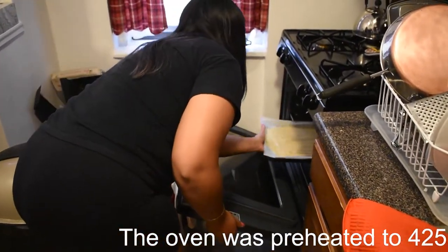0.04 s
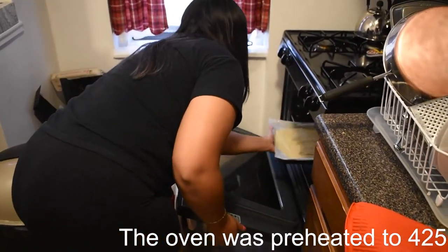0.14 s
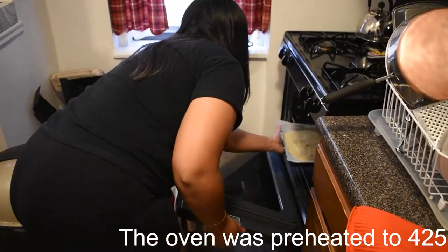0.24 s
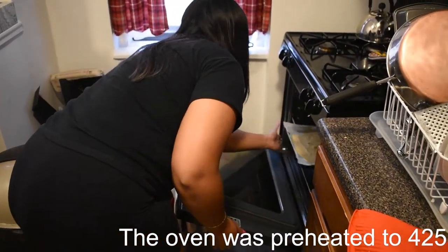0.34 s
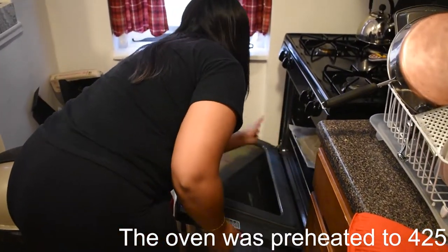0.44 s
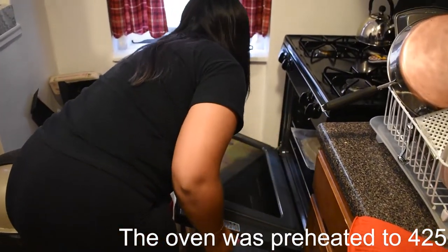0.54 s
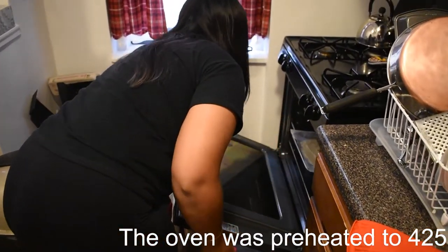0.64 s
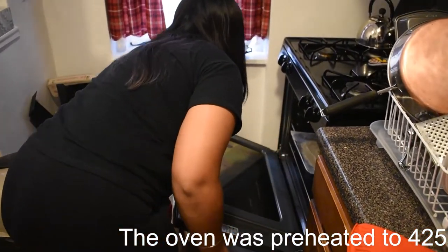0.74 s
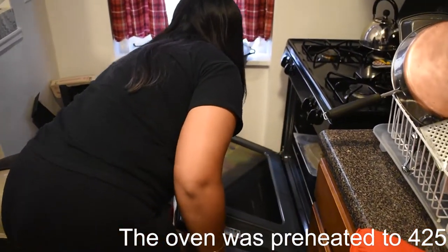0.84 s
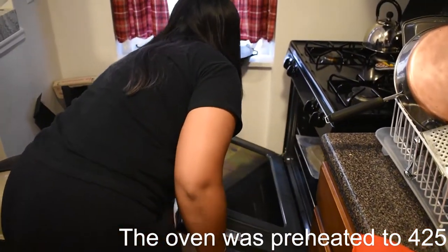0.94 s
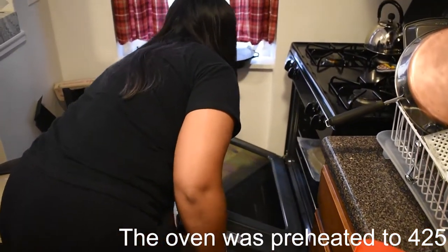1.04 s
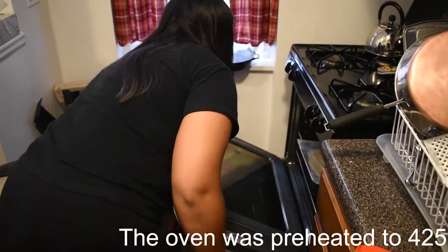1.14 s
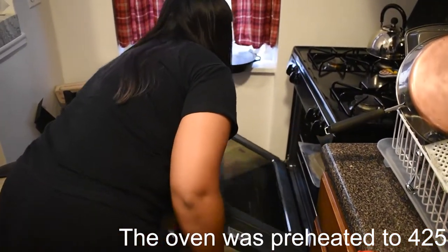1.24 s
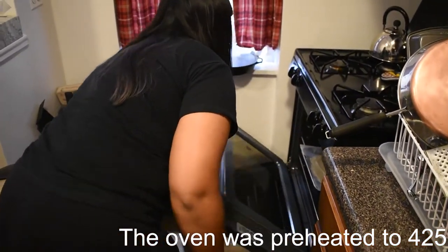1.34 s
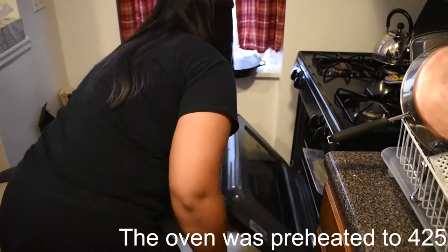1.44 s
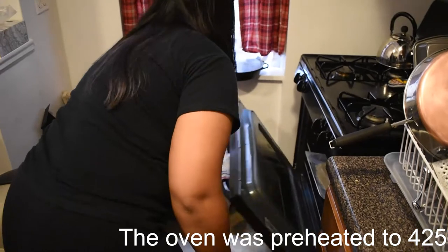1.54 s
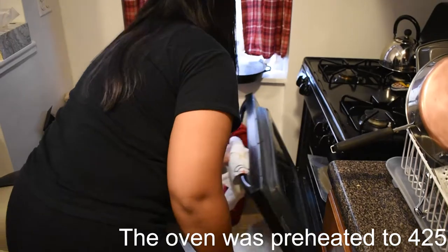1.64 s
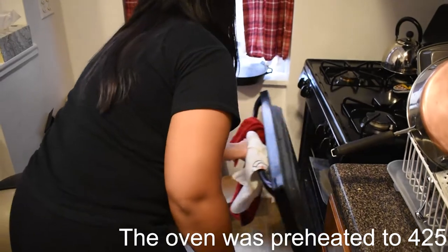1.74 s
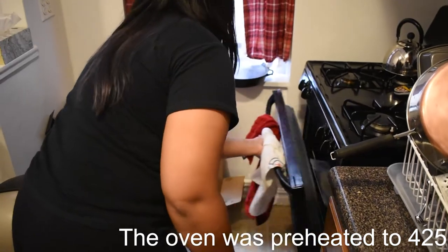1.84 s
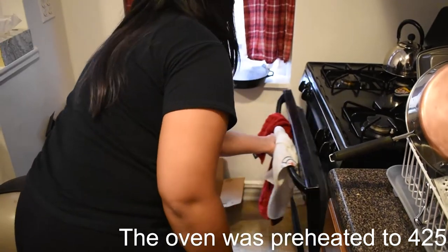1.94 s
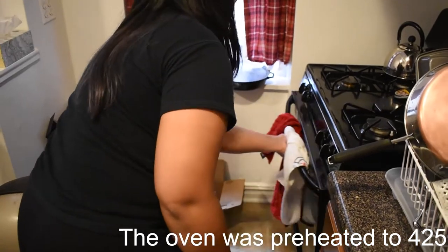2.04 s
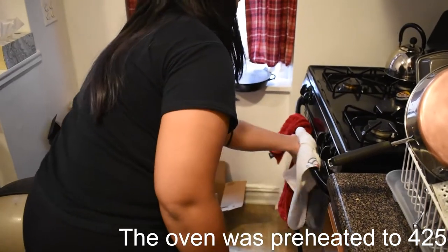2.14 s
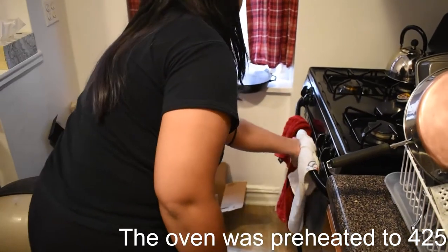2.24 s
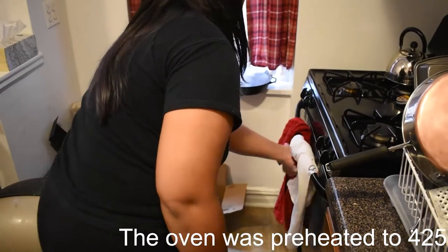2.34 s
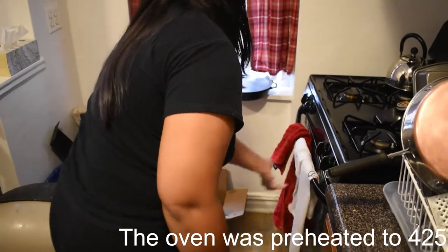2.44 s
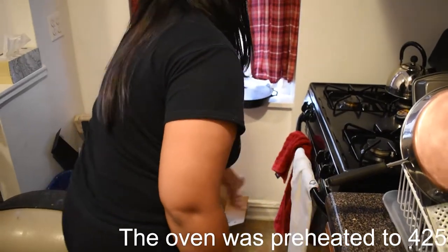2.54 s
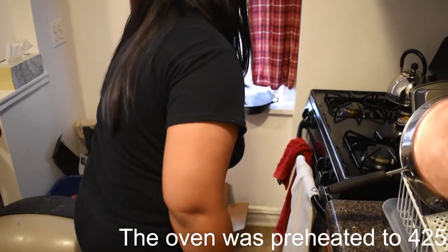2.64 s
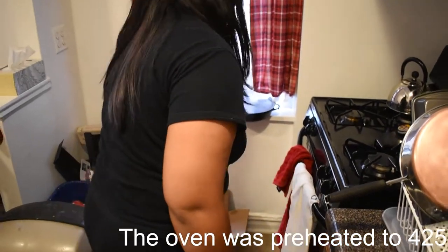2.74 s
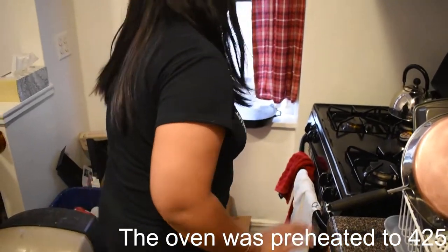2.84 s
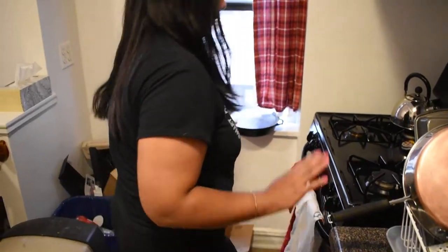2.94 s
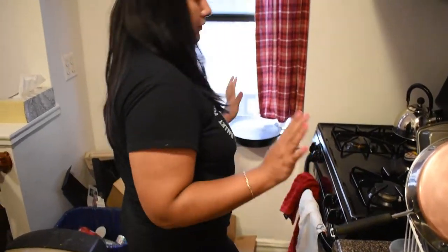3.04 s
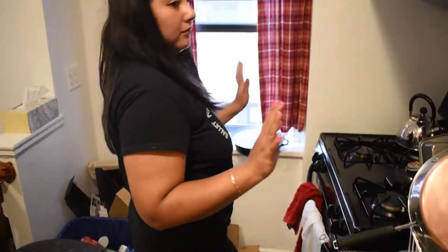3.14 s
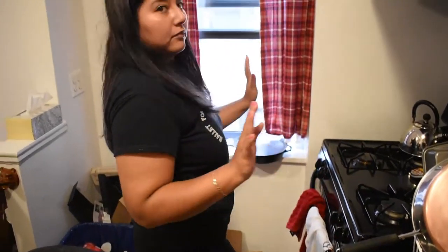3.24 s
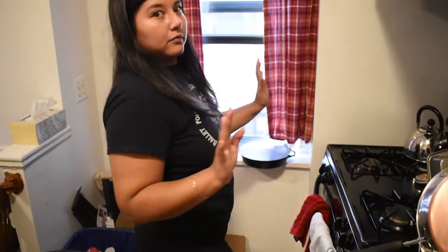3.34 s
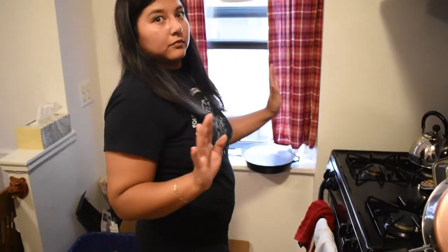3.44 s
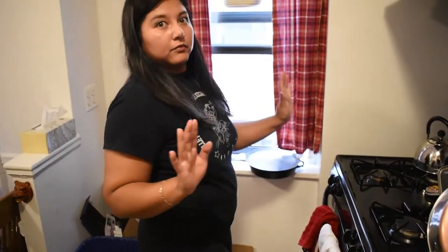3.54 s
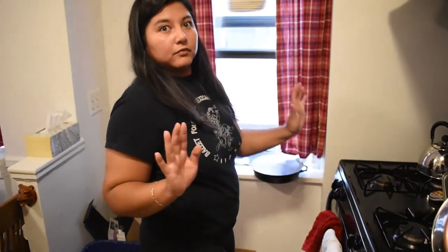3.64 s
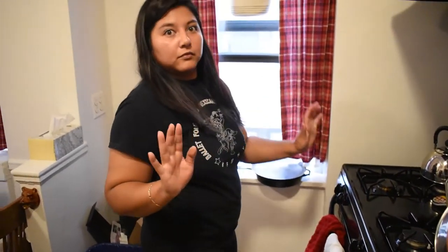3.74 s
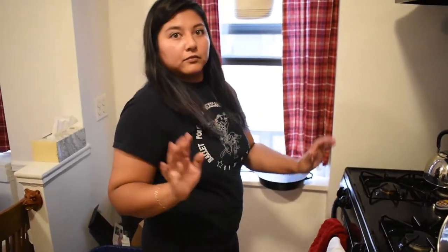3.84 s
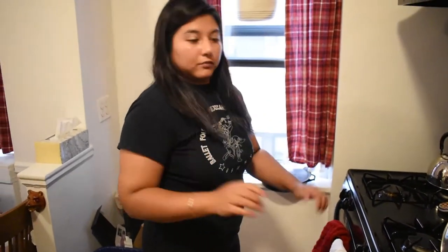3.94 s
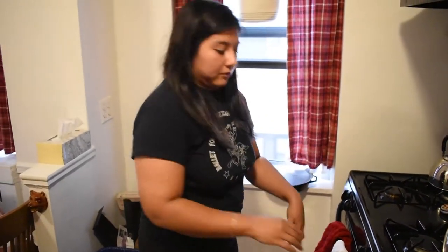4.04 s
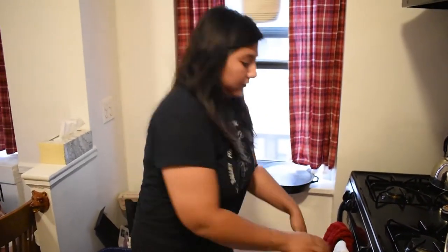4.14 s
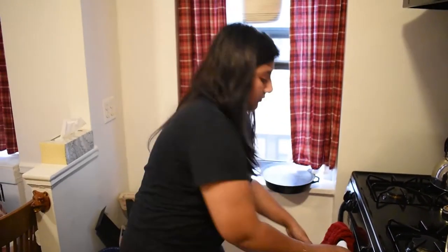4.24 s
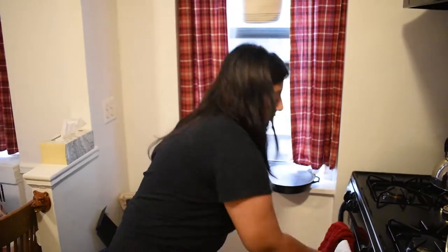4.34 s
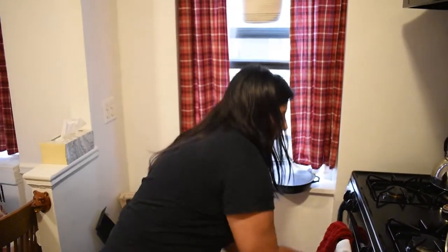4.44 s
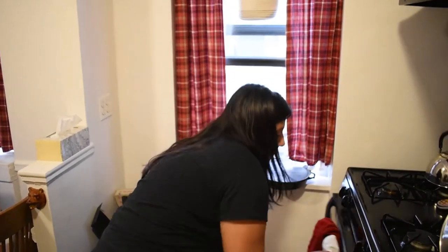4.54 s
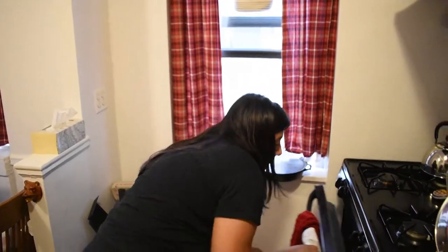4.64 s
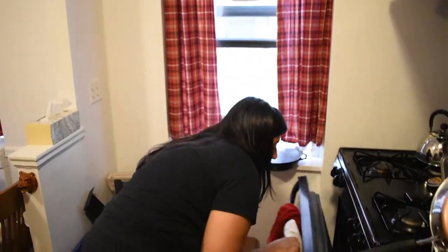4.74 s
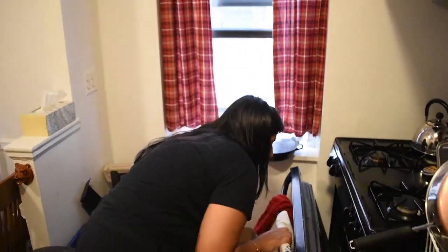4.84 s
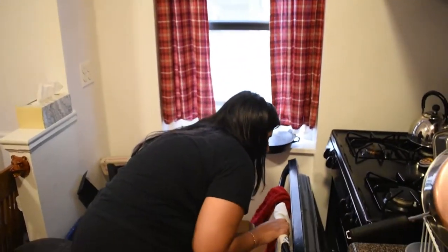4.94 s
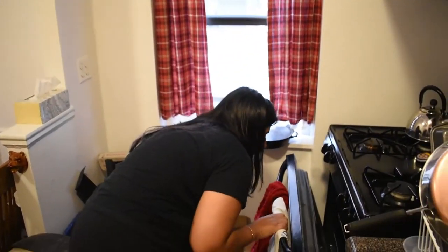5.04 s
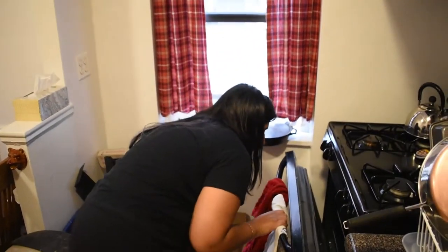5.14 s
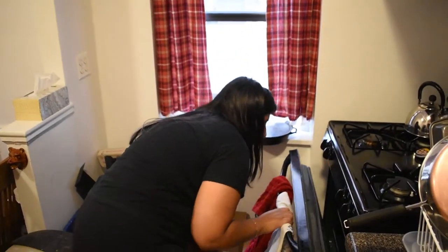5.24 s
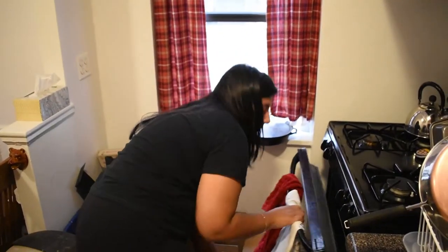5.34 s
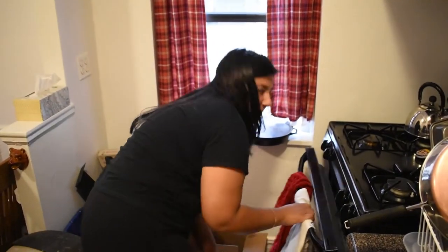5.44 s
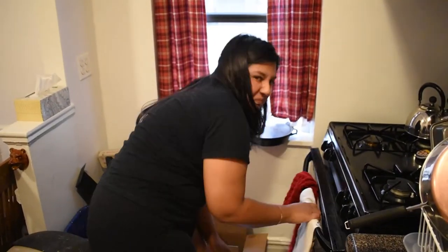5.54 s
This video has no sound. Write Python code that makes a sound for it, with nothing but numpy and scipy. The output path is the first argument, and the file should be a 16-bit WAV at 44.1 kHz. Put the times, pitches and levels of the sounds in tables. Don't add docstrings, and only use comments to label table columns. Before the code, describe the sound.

A close microphone in a small, reflective kitchen picks up soft hiss, low rumble, a very faint high appliance whine and slow, deep air buffeting. At 0 s a metal baking pan touches an oven rack with several quick clacks, then slides in with a grainy scrape that fades by 0.4 s. At about 0.52 s it knocks home in a loud, bright double clang; rim and rack wires ring on with a wavering beat. Small metallic taps come around 1.7 to 1.9 s. From 2.1 to 2.4 s the oven door slams in a dense run of steel bangs, rattles and bassy judders, strongest near 2.3 s, with wires ringing after. A slight settling knock follows at 2.7 s. Faint bright ticks dot 3 to 4.4 s. At 4.5 s the seal releases with a soft hollow knock; from 4.7 to 5.1 s the door eases open with light hinge rubbing and padded thumps, then quiet.

```python
import sys
import numpy as np
from scipy import signal
from scipy.io import wavfile

SR = 44100
rng = np.random.default_rng(int(sys.argv[2]) if len(sys.argv) > 2 else 0)


def volts_from_db(level):
    exponent = np.asarray(level, float) / 20
    return 10 ** exponent


def wav_out(sig):
    wavfile.write(sys.argv[1], SR, np.round(np.clip(np.atleast_2d(sig).T, -1, 1) * 32767).astype(np.int16))


N = 246553


def rms_one(x):
    return x / np.sqrt(np.mean(x ** 2) + 1e-20)


def at_hz(points, hz):
    table_hz, values = np.transpose(points)
    return np.interp(np.log(hz), np.log(table_hz), values)


def passed(x, hz, kind, order=2):
    return signal.sosfilt(signal.butter(order, hz, kind, fs=SR, output="sos"), x)


def drift(rate):
    hold = 40
    r = np.exp(-2 * np.pi * rate * hold / SR)
    white = rng.standard_normal(N // hold + 2002)
    slow = rms_one(signal.lfilter([1], [1, -2 * r, r * r], white)[2000:])
    return np.interp(np.arange(N) / hold, np.arange(len(slow)), slow)


def ring(clicks, hz, t60):
    r, w = volts_from_db(-60 / (t60 * SR)), 2 * np.pi * hz / SR
    return signal.lfilter([0, np.sin(w)], [1, -2 * r * np.cos(w), r * r], clicks + 1e-18)


def clicks_at(events):
    clicks = np.zeros(N)
    for s, level_db in events:
        clicks[round(s * SR)] = volts_from_db(level_db)
    return clicks


def banded(size, spectrum, shape):
    edges = 40 * 2 ** (np.arange(27) / 3)
    white = rng.standard_normal((2, *size))
    out = np.zeros(size)
    for k, (low, high) in enumerate(zip(edges, edges[1:])):
        hz = np.sqrt(low * high)
        if spectrum[0][0] < high and low < spectrum[-1][0]:
            band = passed(white[k % 2], [low, high], "band")
            out += volts_from_db(at_hz(spectrum, hz)) * shape(hz) * band
    return out


def room_hiss():
    # frequency in Hz, density in dB per Hz.
    hiss_spectrum = [(150, -32), (250, 1.5), (400, -3), (640, -5), (890, -11.5), (1330, -10.5),
                     (1800, -18.5), (2900, -22), (3600, -20.5), (5500, -25.5), (8000, -30.5),
                     (13400, -35.5), (16000, -41)]
    return volts_from_db(-48) * rms_one(banded((N,), hiss_spectrum, lambda hz: volts_from_db(1.5 * drift(4.9))))


def floor_shake():
    # time of the peak in seconds, level in dB.
    shakes = [
        (0.0, -38),
        (.81, -52),
        (1.7, -53),
        (2.32, -22),
        (4.95, -41),
    ]
    swell_db_per_s, settle_db_per_s, steady_db = 140, 75, -54
    t = np.arange(N) / SR
    gain = volts_from_db(steady_db)
    for s, db in shakes:
        fall_db = np.maximum(swell_db_per_s * (s - t), settle_db_per_s * (t - s))
        gain = gain + volts_from_db(db - fall_db)
    return gain


def house_rumble():
    # frequency in Hz, density in dB per Hz.
    hum_spectrum = [(40, -2), (55, 0), (80, -16), (100, -17), (120, 3), (160, -3), (220, -5.5), (300, -12),
                    (500, -30)]
    return floor_shake() * rms_one(banded((N,), hum_spectrum, lambda hz: volts_from_db(1.161 * drift(2.6))))


def appliance_whine():
    hz = 3510 + 9.0 * drift(28)
    return volts_from_db(-63.5 + 1.6 * drift(4)) * np.sin(2 * np.pi * np.cumsum(hz) / SR)


def air_pressure():
    # time in seconds, level in dB.
    air_curve = [(0.0, -28), (0.26, -19), (0.53, -32), (0.9, -28), (0.93, -39), (1.29, -22), (1.35, -32),
                 (1.71, -19), (2.52, -37), (2.58, -20), (2.75, -29), (4.73, -32), (4.9, -24), (5.09, -35),
                 (5.51, -30), (5.59, -42)]
    swing_hz = 12.0 + 2.2 * drift(2.956)
    swings = np.sin(2 * np.pi * np.cumsum(swing_hz) / SR) * volts_from_db(2.2 * drift(5))
    flutter = passed(rng.standard_normal(N + SR), [18.0, 45.0], "band")[SR:]
    swing_db = np.interp(np.arange(N) / SR, *np.transpose(air_curve))
    return volts_from_db(swing_db) * rms_one(swings) + volts_from_db(-47.0) * rms_one(flutter)


def grains(per_s, spread_db):
    size_db = spread_db * np.minimum(rng.exponential(1, N), 5)
    sizes = volts_from_db(size_db) * rng.choice([-1, 1], N)
    return rms_one(sizes * (rng.random(N) < per_s / SR))


def sliding(strokes):
    edge_s = .045
    t = np.arange(N) / SR
    pressure = np.zeros(N)
    for s, length, start_db, end_db in strokes:
        fade = np.clip(np.minimum(t - s, s + length - t) / edge_s, 0, 1)
        pressure += fade * volts_from_db(np.interp(t, [s, s + length], [start_db, end_db]))
    return grains(per_s=3000, spread_db=4.0) * pressure * volts_from_db(-17.5 + 2.0 * drift(21))


def contacts(blows, strokes, law):
    rattle_s, rattle_s_per_db, lows_db, lows_per_level, lows_per_hardness, padded_top_hz = law
    low_edge_hz, high_edge_hz = 700, 3500
    rattle = grains(per_s=2500, spread_db=1.5)
    low, mid, high, padded = np.zeros((4, N))
    for s, level_db, high_db in blows:
        start = round(s * SR)
        since = np.arange(start, start + SR // 3) / SR - s
        length = rattle_s + rattle_s_per_db * (level_db + 20)
        low_db = lows_db + lows_per_level * (level_db + 20) + lows_per_hardness * high_db
        burst = rattle[start:][:len(since)] * np.exp(-since / length) * volts_from_db(level_db - 22.0)
        burst *= 1 - np.exp(-since / 0.0017)
        burst[:4] += volts_from_db(level_db - 10.0) * np.array([1, -1, -1, 1])
        if high_db > -25:
            parts = (low, low_db + 7.5), (mid, 0), (high, high_db + 9.0)
        else:
            parts = ((padded, -3.0),)
        for part, db in parts:
            part[start:][:len(since)] += burst * volts_from_db(db)
    rub = sliding(strokes)
    low, mid, high = low + rub * volts_from_db(1.5), mid + rub, high + rub * volts_from_db(-1.5)
    low = passed(low, 2 * low_edge_hz, "low")
    upper = high + passed(mid - high, high_edge_hz, "low")
    bare = low + passed(upper - low, low_edge_hz, "high")
    return bare, passed(padded, [330, padded_top_hz], "band")


def shell(forces, colour, count=5):
    # frequency in Hz, t60 in seconds.
    ring_out = [(150, 0.55), (500, 0.54), (1500, .55), (4000, 0.44), (8000, 0.39), (16000, 0.11)]
    t = np.arange(SR * 3 // 4) / SR
    early = 1 + 2.47 * np.exp(-t / 0.0054)
    answers = banded((count, len(t)), colour, lambda hz: volts_from_db(-60 * t / at_hz(ring_out, hz)) * early)
    answers /= np.max(np.abs(answers))
    bare, padded = forces
    spot = rng.integers(0, count, N)
    touched = bare * (spot == np.arange(count)[:, None])
    touched[0] += padded
    return signal.oaconvolve(touched, answers, axes=1).sum(axis=0)[:N]


def rack(modes, strikes):
    clicks = clicks_at(strikes)
    return sum(volts_from_db(mode_db + 5.2 * drift(7.9)) * ring(clicks, hz, t60) for hz, mode_db, t60 in modes)


def pan():
    # start in seconds, peak in dB, hardness as highs in relative dB.
    blows = [(0.003, -15, -14), (0.02, -15, -16), (0.042, -18, -14), (0.074, -19.5, -14),
             (0.099, -24.5, -12), (0.163, -31.5, -19), (0.257, -35, -8), (0.419, -32.5, -2),
             (0.46, -29, -22), (0.521, -9, -2.5), (0.534, -10.5, -7.5), (0.545, -4, -14.5),
             (0.576, -12, -13), (1.662, -29, -10), (1.718, -38, -8), (1.883, -27, -38)]
    # start in seconds, length in seconds, start level in dB, end level in dB.
    strokes = [
        (-.05, .27, -19, -42),
        (.18, .25, -39, -45),
        (.39, .12, -43, -41),
    ]
    # frequency in Hz, density in dB per Hz.
    steel = [(100, -6.5), (200, 2), (400, -2), (800, 2), (1300, 4), (2000, -2), (3600, -4.5), (5500, -8.5),
             (8000, -19.5), (11000, -19.5), (15500, -23.5), (17000, -50)]
    # frequency in Hz, level in dB, t60 in seconds.
    modes = [(307, -40.5, 2.6), (318, -47, 2.5), (334, -36, 2.44), (881, -35, 1.9), (897, -34, 1.8),
             (1263, -27, 0.39), (1740, -43, 1.6), (1780, -43, 1.4), (1970, -32.5, .4), (2864, -51.5, 1.57),
             (2912, -48, 1.15), (3770, -43, .45), (4170, -42, 0.55)]
    # start in seconds, level in dB.
    strikes = [
        (0.004, -18),
        (0.525, -1.5),
        (0.548, -9),
    ]
    law = (.017, .0003, -11.0, -.7, -.15, 4000.0)
    return shell(contacts(blows, strokes, law), steel) + rack(modes, strikes)


def grate():
    # frequency in Hz, level in dB, t60 in seconds.
    modes = [(324.37, -34, 3.9), (331, -39.5, 3.4), (342, -36.5, 2.9), (418, -31.5, 1.08), (880, -44, 2.5),
             (910, -47, 2.1), (1440, -41, .6), (1766, -42.5, 2.56), (1770, -52, 2.3), (2086.4, -44, 1.5),
             (2290.3, -42, .7)]
    # start in seconds, level in dB.
    strikes = [
        (0.004, -16),
        (0.164, -13),
        (2.117, -4),
        (2.286, -8),
        (2.31, -5.5),
        (4.54, -20),
    ]
    return rack(modes, strikes)


def door_shell():
    # start in seconds, peak in dB, hardness as highs in relative dB.
    blows = [(2.115, -13.5, -3), (2.142, -15, -2), (2.163, -12.5, -16), (2.189, -7, -10.5),
             (2.219, -8.5, -15), (2.248, -6.5, -12.5), (2.285, -1.5, -3), (2.308, -9.5, -7.5),
             (2.334, -13.5, -7), (2.388, -12, -8), (2.664, -24, -12), (2.69, -24, -30), (4.523, -35, -14),
             (4.537, -28, -18), (4.541, -25, -30), (4.78, -32, -30), (4.849, -36, -4), (4.907, -29, -10),
             (4.929, -28, -14), (4.912, -27, -30), (4.934, -24, -30), (4.96, -30, -30), (4.988, -20, -40),
             (5.015, -27, -38), (5.059, -32, -32)]
    # start in seconds, length in seconds, start level in dB, end level in dB.
    strokes = [
        (4.71, .2, -44, -42),
        (4.87, .15, -41, -50),
    ]
    # frequency in Hz, density in dB per Hz.
    steel = [(100, -12), (200, 9.5), (400, 8.5), (800, 0), (1300, 3.5), (2000, -1), (3600, -3.5),
             (5500, -9.5), (8000, -21.5), (11000, -23), (15500, -35), (17000, -55)]
    law = (.022, .0006, -12.0, -.7, -.25, 2200.0)
    return shell(contacts(blows, strokes, law), steel)


def door_panel():
    # frequency in Hz, level in dB, t60 in seconds.
    modes = [(51.423, -6, 0.9), (64.4, 3.5, 0.23), (90, -1.5, 0.15), (116.3, -1, 0.39), (141.3, -12, 0.4),
             (191.4, -5, 0.37), (241, -4, 0.27)]
    # start in seconds, first bump in dB, duration in seconds,
    # gap between bumps in seconds, loss in dB a bump.
    judders = [
        (2.116, -13, .06, .019, -.5),
        (2.178, -8, .08, .0172, -.3),
        (2.393, -16, .05, .0085, 2.5),
        (2.669, -33.5, .001, .02, 3.0),
        (4.539, -41, .001, .02, 3.0),
        (4.929, -23, .09, .017, 3.0),
    ]
    push = np.hanning(round(.0052 * SR))
    force = np.zeros(N)
    for s, level_db, lasts, gap, loss_db in judders:
        for k in range(1 + int(lasts / gap)):
            scatter_db = 2.5 * rng.standard_normal() * (k > 0)
            bump_db = level_db - loss_db * k + scatter_db
            bump = (-1) ** k * volts_from_db(bump_db - 3.0) * push / push.sum()
            force[round((s + gap * k) * SR):][:len(push)] += bump
    body = sum(volts_from_db(mode_db) * ring(force, hz, t60) for hz, mode_db, t60 in modes)
    return passed(body, 62.0, "high")


def ticks():
    # start in seconds, peak in dB.
    settling = [(2.9624, -59), (3.1677, -54.5), (3.3741, -57), (3.4394, -54), (3.554, -50.5), (3.6137, -53),
                (3.924, -53), (4.0394, -54), (4.3904, -54), (4.4294, -53)]
    clicks = volts_from_db(-2.0) * clicks_at(settling)
    return sum(ring(clicks, hz, 0.01577) for hz in (5900., 7300., 8800.))


def latch():
    push = np.zeros(N)
    push[round(4.543 * SR):][:40] = volts_from_db(-29) * np.hanning(40) / 20
    return ring(push, hz=345, t60=.09)


def scene():
    background = room_hiss() + house_rumble() + appliance_whine() + air_pressure()
    oven_door = door_shell() + door_panel() + latch()
    return (background + pan() + grate() + oven_door + ticks())[None]


def band_limit(x):
    return signal.sosfilt(signal.butter(12, 16550, fs=SR, output="sos"), x)


def record(dry):
    recovered_db = 40.0 * np.arange(N) / SR
    over_db = np.maximum(20 * np.log10(np.abs(dry[0]) + 1e-9) + 8.78, 0)
    held_db = np.maximum(np.maximum.accumulate(over_db + recovered_db) - recovered_db, 0)
    r = np.exp(-1 / (0.012 * SR))
    ducked = dry * volts_from_db(-.6 * signal.lfilter([1 - r], [1, -r], held_db))
    rounded = passed(0.92 * np.tanh(ducked / 0.89), 16000.0, "low", order=8)
    return band_limit(rounded)


dry = scene()
out = record(dry)
wav_out(out)
```